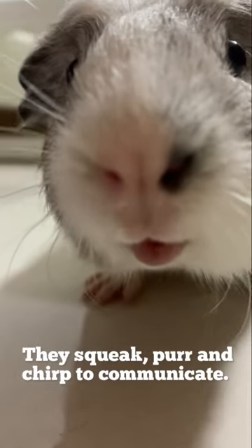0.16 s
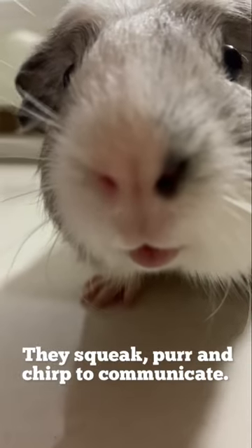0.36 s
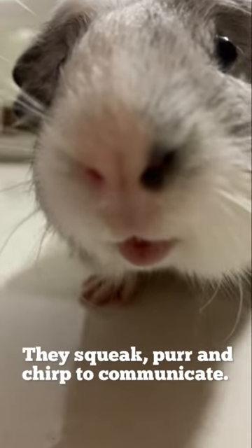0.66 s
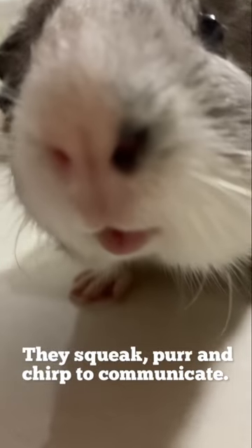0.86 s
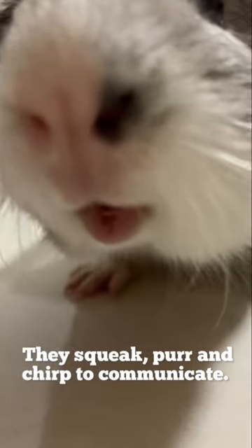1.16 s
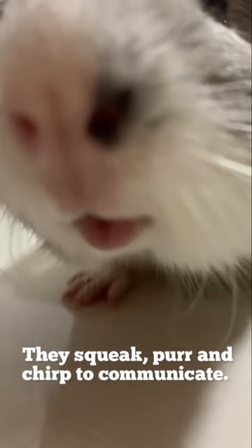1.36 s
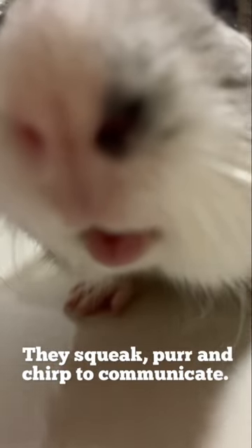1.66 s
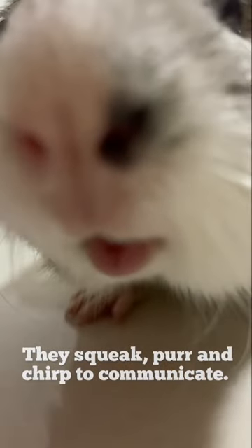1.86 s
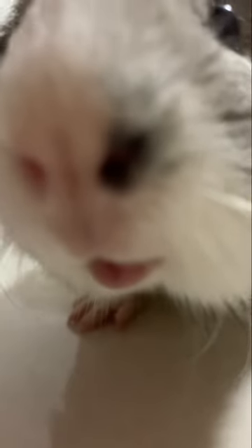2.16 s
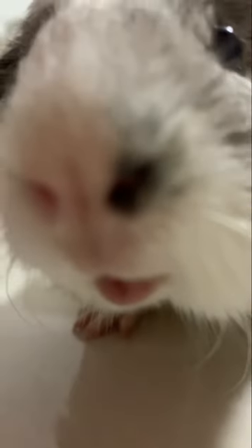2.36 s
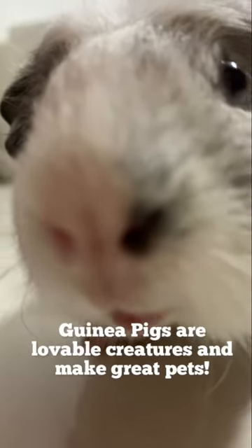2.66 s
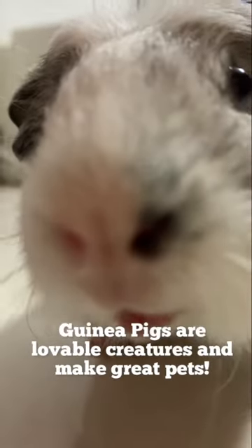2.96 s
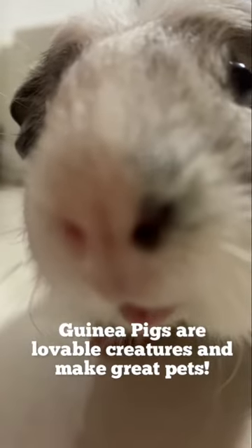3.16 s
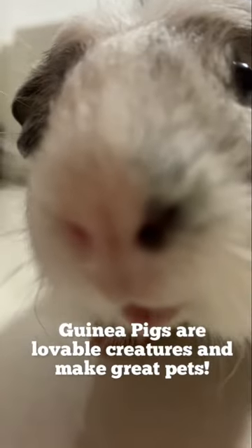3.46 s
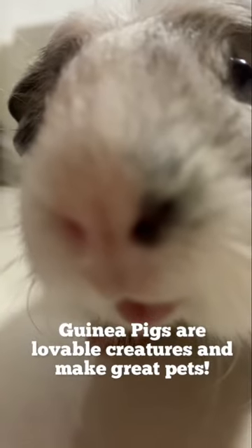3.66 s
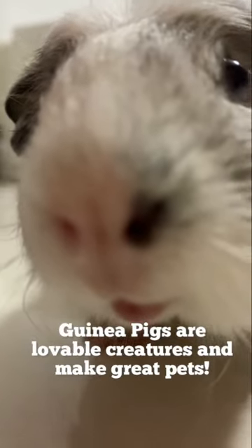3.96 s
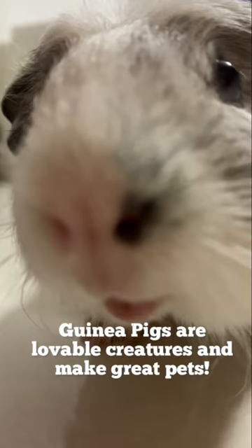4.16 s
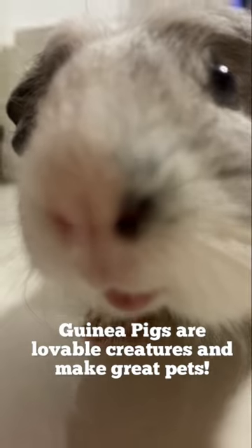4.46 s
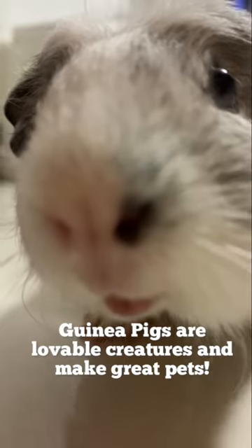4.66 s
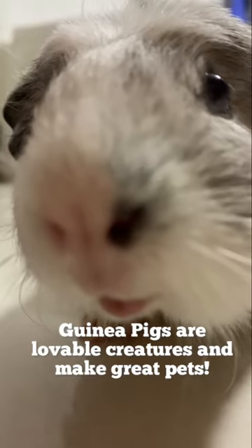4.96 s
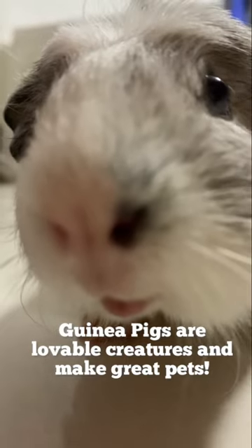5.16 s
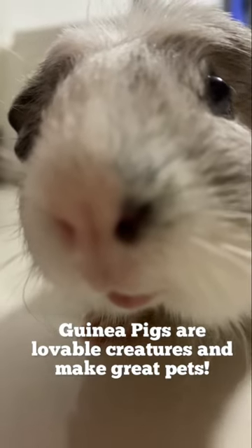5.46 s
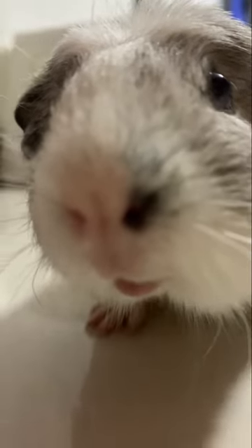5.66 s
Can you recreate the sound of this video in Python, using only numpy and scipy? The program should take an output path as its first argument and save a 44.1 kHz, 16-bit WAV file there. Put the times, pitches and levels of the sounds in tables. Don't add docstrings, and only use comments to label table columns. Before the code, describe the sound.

Rapid rising wheeks from a small rodent at very close range, breathy between calls, lower and softer by the end, in a quiet room.

```python
import sys
import numpy as np
from scipy import signal
from scipy.fft import rfft, irfft, next_fast_len
from scipy.io import wavfile
from scipy.ndimage import uniform_filter1d

SR = 44100
rng = np.random.default_rng(int(sys.argv[2]) if len(sys.argv) > 2 else 0)


def gain_from_db(level_db):
    decades = np.asarray(level_db, float) / 20
    return 10 ** decades


def wrap_up_sound(samples):
    columns = np.atleast_2d(samples).T
    tamed = np.clip(columns, -1, 1)
    steps = np.round(tamed * 32767).astype(np.int16)
    wavfile.write(sys.argv[1], SR, steps)


N = 256662


def evened(x):
    return x / np.sqrt(np.mean(x ** 2) + 1e-20)


def read(points, hz):
    f, value = np.transpose(points)
    return np.interp(np.log(hz + 1), np.log(f + 1), value)


def coloured(x, points):
    hz = np.fft.rfftfreq(x.shape[-1], 1 / SR)
    return irfft(rfft(x) * gain_from_db(read(points, hz)), x.shape[-1])


def drift(count, hz):
    low_pass = signal.butter(4, hz, fs=SR, output="sos")
    return evened(signal.sosfilt(low_pass, rng.standard_normal(count + 4000))[4000:])


def pitch(tension_hz, rest_hz=821.5, bend=2.507):
    # pitch [Hz], width [Hz], push [Hz].
    leaps = [(1316, 185, 100), (1632, 120, 45), (1770, 95, 11), (2338.5, 74, 82), (2788, 110, 37),
             (3135, 150, 120), (3518, 41, 140)]
    hz = (rest_hz ** bend + tension_hz ** bend) ** (1 / bend)
    leap_hz = 0
    for at, width, push in leaps:
        off = (hz - at) / width
        leap_hz = leap_hz + push * off * np.exp(-.5 * off ** 2)
    return hz + leap_hz


def throat(hz, facing, away_deepen=0.69, high_deepen=.35, beamed_hz=6000):
    # frequency [Hz], level [dB].
    mouth = [(700, -8.5), (1600, 5.5), (2300, -2), (3300, -5), (4600, -8), (7000, -6.5), (11000, -12.5),
             (15900, -12.5)]
    # frequency [Hz], half width [Hz], level [dB].
    rings = [(1196, 70, -6), (1807, 110, -8), (2619, 61, -5), (2785, 79, 9.5), (3872, 243, -13.5),
             (5580, 104, -12), (6577, 313, 10.5), (7910, 720, 5.5), (8750, 200, -6), (11340, 570, -8.5),
             (11640, 100, 10), (13850, 210, 16.5)]
    # frequency [Hz], half width [Hz], level [dB].
    nose = [(3520, 100, 6), (4304, 120, -3.5)]
    colour_db = read(mouth, hz)
    for at, width, db in rings + nose:
        if at > beamed_hz:
            scale = facing
        else:
            deepen = away_deepen * (1 - facing) + high_deepen * (at > nose[0][0])
            scale = 1 + deepen * (db < 0)
        colour_db = colour_db + db * scale / (1 + ((hz - at) / width) ** 2)
    return colour_db


def breath(t, start_s, stop_s, done, slack, folds, turn, puff, closing_db):
    # frequency [Hz], level [dB per Hz].
    hiss = [(700, -28), (2000, -6.5), (4000, -8.5), (5300, -2.5), (6700, 0), (8000, -11.5), (9000, -16),
            (10200, -8), (11500, -7.5), (14500, -8.5), (15800, -30)]
    gate, level_db, shut_db, smack_db = 0.56, -3.0, -15, -2
    end_s, after_db, after_treble_db, start_db, start_treble_db = puff
    air_db = np.where(t > stop_s - 0.006, after_db, start_db + closing_db * done ** 0.79)
    air_db = uniform_filter1d(air_db, size=300) + level_db
    lips = np.clip((t - start_s + .015) / .008, 0, 1) * np.clip((end_s + .003 - t) / .006, 0, 1)
    chopped = rng.standard_normal(len(t)) * (1 + gate * folds * np.cos(turn))
    rush = evened(coloured(chopped, hiss))
    top = signal.sosfiltfilt(signal.butter(4, 8800, "high", fs=SR, output="sos"), rush)
    opening_db = np.where(t > stop_s, after_treble_db, start_treble_db + shut_db * slack)
    opening_db = uniform_filter1d(opening_db, size=150)
    tick = np.exp(-((t - start_s + 0.0022) / 0.0027) ** 2)
    opening_db = opening_db + (smack_db - shut_db) * tick + 3.5 * drift(len(t), hz=25)
    flow = gain_from_db(air_db) * gain_from_db(3 * drift(len(t), hz=30)) * lips
    return flow * (rush + (gain_from_db(opening_db) - 1) * top)


def squeal(glide, push, pose, puff):
    # tension [as Hz], level [dB], roll-off of the partials [dB per octave].
    fold_law = np.array([(517.5, -32, 13.5), (1429, -36.5, 8.0), (2185, -31, 3.5), (2783, -23.5, 8),
                         (3435, -20, 8), (4180, -11.5, 6.5)])
    sag, sag_s, patchy_db = .05, 0.013, 2.5
    slack_lift_db, slack_cut_db = 7, 3.5
    peak, mouth_shift, facing, upper_db, closing_db = pose
    s, tension_hz = np.transpose(glide)
    start_s, stop_s = s[0], s[-1]
    t = np.arange(N) / SR
    at = (t > start_s - .016) & (t < puff[0] + .004)
    t = t[at]
    tension_hz = np.interp(t, s, tension_hz)
    done = np.clip((t - start_s) / (stop_s - start_s), 0, 1)
    effort_db = read(fold_law[:, [0, 1]], tension_hz) + np.interp(done, [0, peak, 1], push[:3])
    roll_db = read(fold_law[:, [0, 2]], tension_hz) + np.interp(done, [0, peak, 1], [0, *push[3:]])

    slump = sag * np.clip(1 + (t - stop_s) / sag_s, 0, 2) ** 2
    hz = uniform_filter1d(pitch(tension_hz), size=90, mode="nearest") * (1 - slump)
    slack = np.minimum(900 / hz, 1) ** 2
    k = np.arange(1, 19)[:, None]
    slack_db = slack * (k > 2) * (slack_lift_db - slack_cut_db * np.clip(k - 4, 0, 2))
    colour_db = throat(k * hz / mouth_shift, facing) + slack_db
    waver = .007 * (1 - .6 * done) * drift(len(t), hz=40)
    rough = .008 * slack ** 2 * drift(len(t), hz=500)
    hz = hz * (1 + waver + rough)
    turn = 2 * np.pi * np.cumsum(hz) / SR

    share_db = effort_db - roll_db * np.log2(k) + upper_db * (k > 2) + colour_db
    share = gain_from_db(share_db) * (k * hz < 16000)
    flicker = np.array([drift(len(t), hz=60) for _ in k])
    share *= gain_from_db(patchy_db * (k > 2) * (.5 + slack) * flicker)
    folds = np.clip((t - start_s + .002) / .003, 0, 1) * np.clip((stop_s + .004 - t) / .012, 0, 1)
    voice = np.sqrt(2) * gain_from_db(.8 * drift(len(t), hz=50)) * folds * (share * np.sin(k * turn)).sum(0)

    out = np.zeros(N)
    out[at] = voice + breath(t, start_s, stop_s, done, slack, folds, turn, puff, closing_db)
    return out


def room(x, t60_s=.45, wet_db=-36, floor_s=.0016, floor_db=-26):
    size = SR // 2
    taps = np.zeros((2, size))
    at = np.arange(300, size - 20, 20) + rng.integers(0, 20, (2, (size - 301) // 20))
    np.put_along_axis(taps, at, rng.choice([-1., 1.], at.shape), 1)
    taps *= gain_from_db(-60 * np.arange(size) / SR / t60_s)
    taps = taps[0] + .3 * taps
    taps *= gain_from_db(wet_db) / np.linalg.norm(taps[0])
    taps[:, 0] = 1
    taps[:, round(floor_s * SR)] = gain_from_db(floor_db)
    return signal.fftconvolve(x[None], taps, axes=1)[:, :N]


def background(apart=0.12, air_db=-3, hum_db=57):
    # frequency [Hz], level [dB per Hz].
    air_spectrum = [(15, -46.5), (30, -16.5), (45, -8), (95, -5), (320, -18.5), (460, -12), (530, -23),
                    (900, -22), (1400, -33), (2900, -38), (5000, -41.5), (8500, -52), (11800, -42),
                    (13500, -60.5), (15500, -59.5)]
    # frequency [Hz], width [Hz], level [dB].
    hum_lines = [(47.5, 5.5, -65), (68.6, 2.3, -64.5), (100.2, 8.9, -58), (140.7, 7.4, -69),
                 (272.5, 3, -72.5), (471.8, 1.7, -66)]
    # time [s], level [dB].
    swell = [(0.0, -57), (1.39, -55), (2.4, -54.5), (5.82, -50)]
    t = np.arange(N) / SR
    air = rng.standard_normal(N) + apart * rng.standard_normal((2, N))
    hum = np.zeros(N)
    for hz, width, db in hum_lines:
        hum += gain_from_db(db) * np.cos(2 * np.pi * hz * t) * (1 + 0.21 * drift(N, hz=width))
    both = gain_from_db(air_db) * evened(coloured(air, air_spectrum)) + gain_from_db(hum_db) * hum
    return gain_from_db(np.interp(t, *np.transpose(swell))) * both


def thump():
    # start [s], low mode [Hz], high mode [Hz], level [dB], length [s].
    bump = (4.05, 140, 188, -49, .075)
    s, low_hz, high_hz, db, length_s = bump
    t = np.clip(np.arange(N) / SR - s, 0, length_s)
    modes = np.sin(2 * np.pi * low_hz * t) + np.sin(2 * np.pi * high_hz * t)
    return gain_from_db(db) * np.sin(np.pi * t / length_s) * modes


def scene():
    # time [s], fold tension [as Hz].
    glides = [
        [(0.004, 1523), (0.042, 2000), (0.066, 2615), (0.096, 2340), (0.15, 3157), (0.174, 3070), (0.183, 3730),
         (0.195, 3780), (0.229, 3285)],
        [(0.367, 246.4), (0.413, 663), (0.524, 2380), (0.617, 2831), (0.623, 2951), (0.626, 3323),
         (0.718, 3876), (0.736, 3595), (0.741, 3710)],
        [(0.88, 420.4), (0.904, 432), (0.928, 708), (1.003, 2165), (1.033, 2504), (1.116, 2774), (1.2, 4084),
         (1.245, 4280), (1.268, 4018)],
        [(1.432, 203.5), (1.482, 606), (1.53, 1521), (1.586, 2003), (1.604, 2320), (1.751, 3093), (1.82, 3973),
         (1.871, 4084), (1.884, 4084)],
        [(2.073, 17), (2.116, 495), (2.164, 1360), (2.206, 1659), (2.248, 2419), (2.275, 2291), (2.407, 2904),
         (2.451, 2811), (2.465, 2602)],
        [(2.63, 381), (2.673, 646), (2.727, 1736), (2.805, 2503), (2.879, 2946), (2.891, 2873), (3.002, 3036),
         (3.017, 2925), (3.022, 3065)],
        [(3.21, 388.4), (3.239, 468.5), (3.296, 1349), (3.385, 2226), (3.412, 2243), (3.427, 2546),
         (3.439, 2480), (3.511, 2774), (3.694, 3084)],
        [(3.99, 242.4), (4.008, 299.8), (4.086, 1616), (4.101, 1597), (4.116, 2032), (4.134, 1954),
         (4.17, 2324), (4.361, 2989), (4.369, 2700)],
        [(4.593, 332), (4.616, 378.6), (4.672, 1292), (4.708, 1451), (4.72, 1759), (4.825, 2292), (4.921, 2346),
         (4.942, 2287), (4.948, 2276)],
        [(5.154, 236), (5.235, 1126), (5.241, 1121), (5.271, 1603), (5.298, 1570), (5.343, 1892), (5.4, 1953),
         (5.415, 1746), (5.424, 1540)],
        [(5.603, 349.6), (5.666, 1054), (5.681, 1346), (5.702, 1400), (5.711, 1642), (5.726, 1626),
         (5.744, 1899), (5.801, 2305), (5.814, 2280)],]
    # push at start, peak and end [dB], dulling at peak and end [dB per octave].
    pushes = [(0.9, 1.45, -9.5, -3, -1.8), (-3, 2.5, -8, -6, -3.1), (-2.3, 6.5, -7.6, -3.5, -1.5),
              (0, 4.5, 0.7, -3.5, 6), (1.2, 2.5, -3.2, -0.5, 7.5), (-0.95, 6.5, -2.5, -3.5, 3.5),
              (1.0, 3, -1, 0.3, 2.5), (2.2, 4.5, -9.5, 2.0, 2.5), (3, 4, 0.1, 2.5, 20),
              (2, 3.5, -8.5, 4, 8.5), (-5.5, 12.5, -15.5, 6, 3.8)]
    # push peak [share of call], mouth shift [factor], treble peaks facing the microphone
    # [share], lift of upper partials [dB], closing of the air leak [dB].
    poses = [(.6, .99, 0.89, -2.5, -7.5), (0.68, 1.013, 0.97, -7.5, -13), (0.62, 1.0164, 1, -4, -10),
             (0.58, 1.006, 1, -4, -13.5), (0.8, 1.0064, .99, -2, -22), (0.72, 1.014, 0.87, -2.5, -17.5),
             (0.55, 0.9993, 1, -2.5, -17), (0.61, 0.9935, 0.71, -5, -17), (0.53, 1.001, 0.18, -4.5, -18.5),
             (0.56, 0.987, 0.2183, -4.5, -7), (0.15, 0.84, 0.1, -11.5, -10)]
    # end of the breath after it [s], its level [dB], its extra treble [dB],
    # breath at the call's start [dB], its extra treble [dB].
    puffs = [ (.246, -60, -9.5, -47, 1.5), (.75, -49.5, -2.5, -49, 6), (1.278, -49, -6, -49, 9.5),
             (1.898, -47, -9, -46.5, 6.5), (2.485, -52.5, -11.5, -44, -3.5),
             (3.04, -50.5, -10.5, -45.5, -5.5), (3.768, -53.5, -5.5, -47, -2),
             (4.403, -49.5, -7, -45.5, -2), (4.961, -53, 0.1, -47.5, 1), (5.434, -58.5, -36, -61.5, 12),
             (5.83, -76, -1.5, -54, 4)]
    calls = zip(glides, pushes, poses, puffs)
    animal = sum(squeal(*call) for call in calls)
    return room(animal) + background() + thump()


def ports(dry):
    # frequency [Hz], level [dB].
    port_db = [(90, 1), (330, 1.5), (770, 7.5), (1100, 12), (1500, 4), (1850, 5.5), (2200, 2), (2700, 6),
               (2900, 3), (3300, 3), (3600, 6), (3850, -1), (5050, 8.5), (5700, -2), (6600, 0)]
    # frequency [Hz], phase [radians].
    port_turn = [(100, .3), (500, 1.3), (900, 1.9), (1300, 1.2), (1650, 1.9), (2050, 1.3), (2550, 2.5),
                 (2750, 6.4), (2900, 8.6), (3020, 9.7), (3500, 10.9), (3850, 9.4), (4200, 10.3),
                 (5500, 9.7), (6400, 10.33), (15800, 9.9)]
    lag_s = 10 / SR
    size = next_fast_len(N + 4096)
    hz = np.fft.rfftfreq(size, 1 / SR)
    z = rfft(dry, size)
    phase = 2 * np.pi * hz * lag_s - read(port_turn, hz)
    z[1] *= gain_from_db(-read(port_db, hz)) * np.exp(1j * phase)
    return irfft(z, size)[:, :N]


def masked(x, width=12, up_db=5.5, down_db=12, depth_db=21.5, cut_db=-30, from_hz=2400):
    hz, _, z = signal.stft(x, SR, nperseg=1024, noverlap=768)
    band = np.arange(len(hz)) // width
    power = np.maximum.reduceat((abs(z) ** 2).mean(0), np.arange(0, len(hz), width))
    level_db = uniform_filter1d(10 * np.log10(power + 1e-20), size=3, axis=1)
    number = np.arange(len(level_db))
    gap = number[:, None] - number
    spread_db = np.where(gap > 0, -up_db * gap, down_db * gap)
    mask_db = (level_db[None] + spread_db[:, :, None]).max(1) - depth_db
    chance = rng.standard_normal(mask_db.shape[::-1]).T
    mask_db += 5 * evened(uniform_filter1d(chance, size=8, axis=1))
    buried = np.clip(mask_db - level_db, 0, 1)[band] * (hz[:, None] > from_hz)
    return signal.istft(z * gain_from_db(cut_db * buried), SR, nperseg=1024, noverlap=768)[1][:, :N]


def roll_off(x):
    return signal.sosfilt(signal.butter(12, 16120, fs=SR, output="sos"), x)


def record(dry):
    mix = masked(ports(dry))
    return roll_off(mix)


dry = scene()
out = record(dry)
wrap_up_sound(out)
```